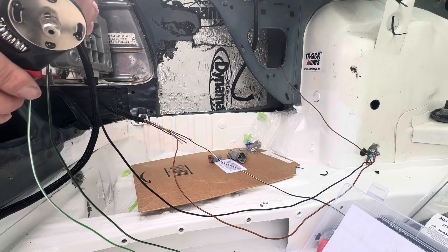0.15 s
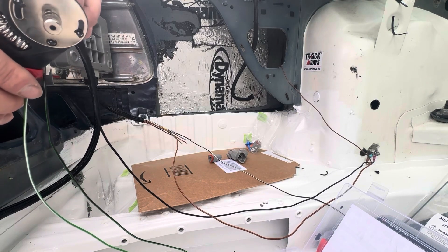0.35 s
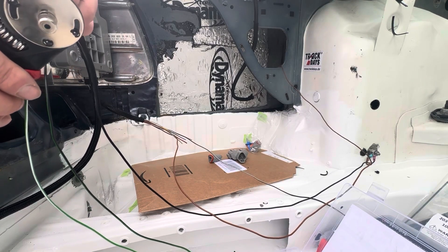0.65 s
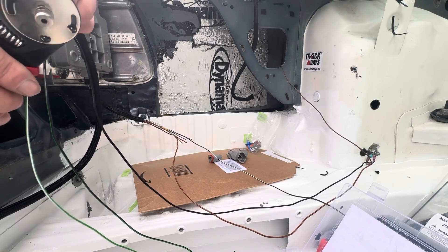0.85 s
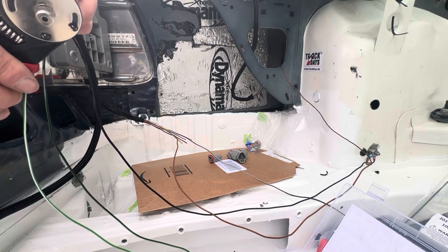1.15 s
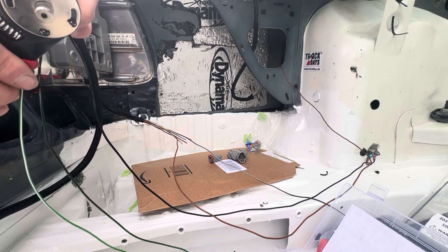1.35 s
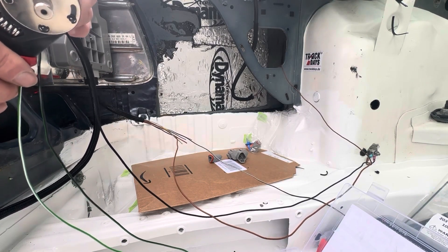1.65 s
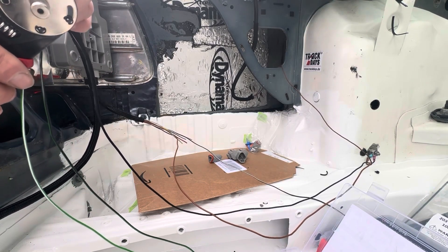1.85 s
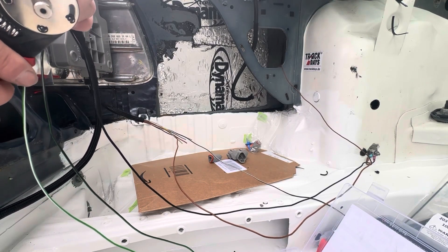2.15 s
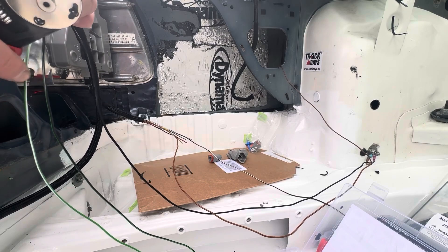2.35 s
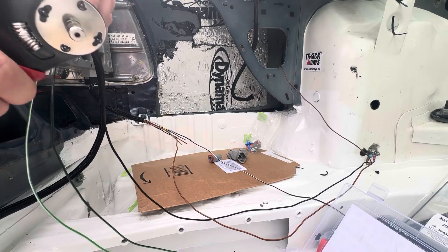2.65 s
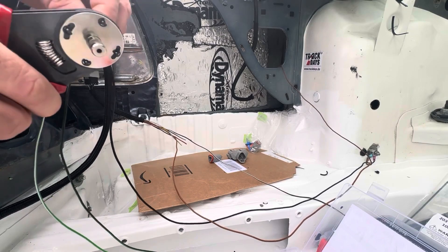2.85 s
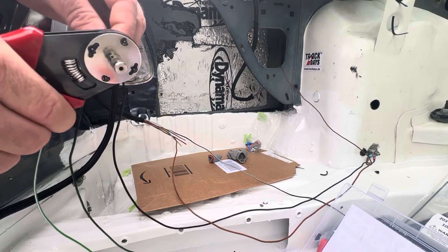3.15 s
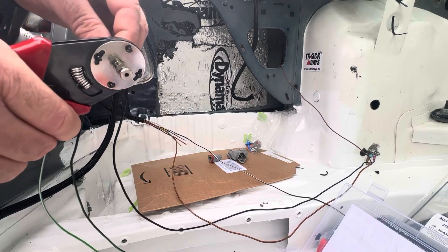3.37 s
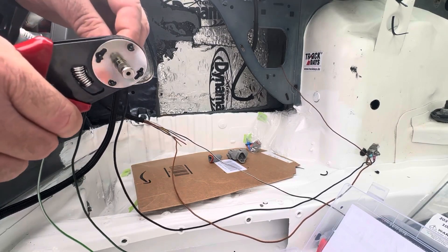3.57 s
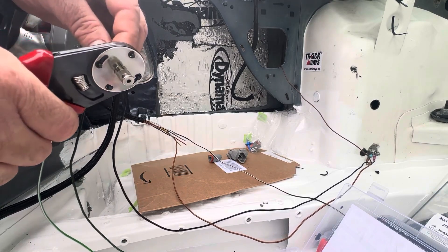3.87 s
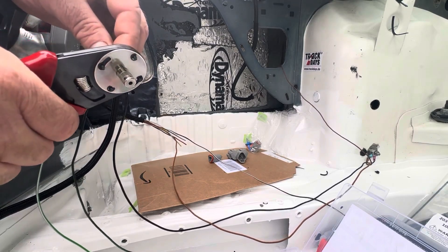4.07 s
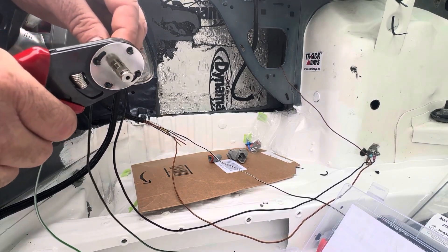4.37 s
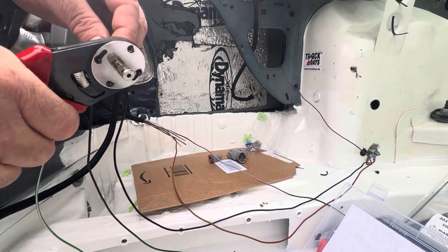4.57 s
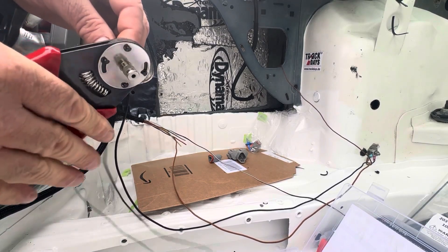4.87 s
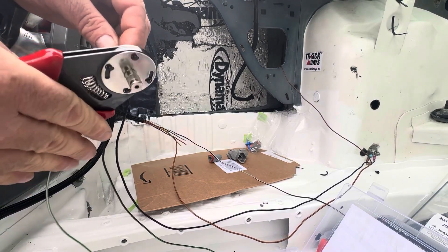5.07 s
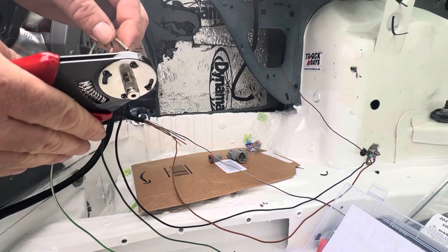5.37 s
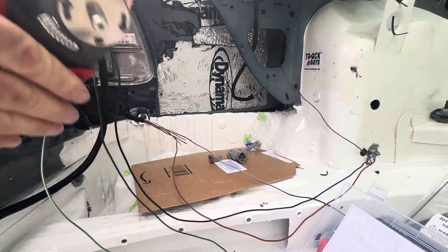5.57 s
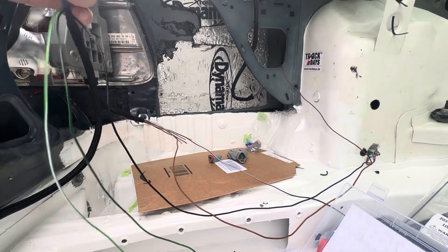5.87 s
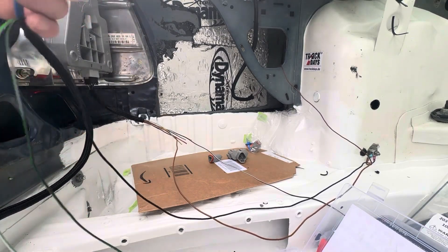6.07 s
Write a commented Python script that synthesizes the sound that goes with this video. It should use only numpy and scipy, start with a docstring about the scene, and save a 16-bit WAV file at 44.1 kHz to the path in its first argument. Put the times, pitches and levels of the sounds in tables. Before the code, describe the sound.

Close view of a hand crimping tool in a bare steel car shell, over a faint low workshop hum. Tiny ticks and a brief crunch come first, then a pause, crisp ringing ratchet clicks in two groups, a short falling scuff, and a loud clack as the handles spring open. Wires rustle at the end with soft knocks and a quick pin chatter.

```python
"""A ratcheting crimp tool is squeezed on a small pin inside the bare steel shell of a car in a garage.
Light touches and wire rustle come first; then steel crunches as the pin seats, and the pawl, by impact
and modal ringing, drops over tooth after tooth. A sleeve scuffs past by stick-slip friction, the pawl
lets go and the handles spring open against their stop. Last, wires slide on the panels amid soft knocks,
the shell booms and the pin chatters. Filtered noise gives the workshop's faint hum throughout."""
import sys
import numpy as np
from scipy import signal
from scipy.fft import rfft, irfft
from scipy.io import wavfile

SR = 44100
rng = np.random.default_rng(int(sys.argv[2]) if len(sys.argv) > 2 else 0)


def store_pcm(level_fs):
    """Save levels as 16-bit WAV."""
    pcm = np.round(np.clip(level_fs, -1, 1) * 32767).astype(np.int16)
    wavfile.write(sys.argv[1], SR, np.atleast_2d(pcm).T)


N = 274302
TIME = np.arange(N) / SR
OPEN_ALIKE, HIDDEN_ALIKE = .75, .3  # left-right likeness of a sound in plain view, and behind the hand


def from_db(db):
    """Amplitude ratio: decibels to gain."""
    return 10 ** (np.asarray(db) / 20)


def rms_one(x):
    """Power normalization: scale to unit power."""
    return x / np.sqrt(np.mean(x ** 2) + 1e-20)


def at_hz(points, hz):
    """Logarithmic interpolation: read a table on a log-frequency axis."""
    f, value = np.transpose(points)
    return np.interp(np.log(np.maximum(hz, 1)), np.log(f), value)


def colour(x, spectrum):
    """Spectral shaping: weight a signal by a smooth spectrum, at unit power."""
    size = x.shape[-1]
    gain = from_db(at_hz(spectrum, np.fft.rfftfreq(size, 1 / SR)))
    return rms_one(irfft(rfft(x) * gain, size))


def shelve(x, top_db):
    """High shelf: lift or dull the highest treble, at unit power."""
    return colour(x, [(9500, 0), (14000, top_db)])


def bandlimit(x, hz, kind):
    """Second-order Butterworth filtering: pass the low, high or middle frequencies."""
    return signal.sosfilt(signal.butter(2, hz, kind, fs=SR, output="sos"), x)


def resonate(x, hz, width_hz):
    """Simple resonance: a two-pole filter with gain 1 on top."""
    r = np.exp(-np.pi * width_hz / SR)
    numerator = np.array([1, 0, -1]) * (1 - r * r) / 2
    denominator = [1, -2 * r * np.cos(2 * np.pi * hz / SR), r * r]
    return signal.lfilter(numerator, denominator, x)


def fade(t, t60):
    """Exponential decay: 60 dB down at t60."""
    return np.exp(-np.log(1000) * t / t60)


def add(track, s, sound):
    """Superposition: mix a sound into a track at a time."""
    start = max(round(s * SR), 0)
    part = sound[..., :N - start]
    track[..., start:start + part.shape[-1]] += part


def strokes(rows, swell_db_per_s, fade_db_per_s):
    """Stroke envelope: each (time, hold, level) row swells up to its time, holds, then dies away."""
    power = 0
    for s, hold_s, db in rows:
        before_db = swell_db_per_s * np.maximum(s - TIME, 0)
        after_db = fade_db_per_s * np.maximum(TIME - s - hold_s, 0)
        power = power + from_db(db - np.minimum(before_db + after_db, 200)) ** 2
    return np.sqrt(power)


def ringing(hz, db, t60):
    """Modal superposition: one second of decaying modes, each a quarter cycle apart at the two channels."""
    t = TIME[:SR]
    apart = rng.choice([-1, 1], (len(hz), 1)) * np.pi / 2
    phase = rng.uniform(0, 2 * np.pi, (len(hz), 1)) + np.array([0 * apart, apart])
    waves = np.sin(2 * np.pi * hz[:, None] * t + phase)
    return np.sum(from_db(db)[:, None] * fade(t, t60[:, None]) * waves, axis=1)


def overtones(low_hz, high_hz=14000, count=140, t60=0.24):
    """High modal density: many close modes of spring, pins and plates make a grainy, decaying shimmer."""
    lines = np.zeros((2, SR // 2 + 1), complex)
    hz = (low_hz * (high_hz / low_hz) ** rng.random(count)).astype(int)
    lines[:, hz] = rng.standard_normal(count) * np.exp(2j * np.pi * rng.random((2, count)))
    return rms_one(irfft(lines, SR)) * fade(TIME[:SR], t60)


# spectrum of steel meeting steel: (frequency [Hz], level [dB])
CONTACT_SPECTRUM = [(400, -21), (1000, -16), (1700, -14), (2700, -4), (3600, -3.5), (4500, -6.5),
                    (5600, -2.5), (7000, -3), (10500, -1), (15500, -5)]


def crack(length_ms, humps, top_db=0, buzz_db=-23, buzz_t60=0.043):
    """Impact excitation: a brief burst with broad (Hz, dB) resonances, then a short buzz of loose parts."""
    t = TIME[:2048]
    build_up = 1 - np.exp(-t / .0004)
    blow = np.exp(-t * 1000 / max(length_ms, .2))
    envelope = (blow + from_db(buzz_db) * fade(t, buzz_t60)) * build_up
    burst = rms_one(colour(rng.standard_normal((2, len(t))), CONTACT_SPECTRUM) * envelope)
    for hz, db in humps:
        noise = rng.standard_normal((2, len(t))) * envelope
        burst = burst + from_db(db) * rms_one(resonate(noise, hz, hz / 8))
    burst = shelve(burst, top_db) * np.sqrt(np.mean(envelope ** 2))
    return bandlimit(burst, 900, "high")


def at_channels(x, alike):
    """Interchannel coherence: from the left, the right is a little late, inverted and only partly alike."""
    lag_s = .000204
    late = np.interp(TIME - lag_s, TIME, x[0])
    return np.array([x[0], np.sqrt(1 - alike ** 2) * x[1] - alike * late])


# ring of the car's shell: (frequency [Hz], t60 [s])
SHELL_DECAY = [(300, 0.32), (1500, 0.51), (4000, 0.16), (9000, 0.0063), (15000, 0.053)]
# ring of the garage round it: (frequency [Hz], t60 [s])
GARAGE_DECAY = [(2500, 0.39), (12000, 0.2)]


def shell(x, early_db, shell_db, garage_db, early_t60=0.041):
    """Reverberation: dense echoes off the close panels, the ring of the shell, and a faint garage tail."""
    t, edges = TIME[:SR * 3 // 4], np.geomspace(100, 18000, 12)
    response = 0
    for low, high in zip(edges, edges[1:]):
        noise = bandlimit(rng.standard_normal((2, len(t))), [low, high], "band")
        middle = np.sqrt(low * high)
        stages = [(early_db, early_t60), (shell_db, at_hz(SHELL_DECAY, middle)),
                  (garage_db, at_hz(GARAGE_DECAY, middle))]
        power = 0
        for db, t60 in stages:
            decay = fade(t, t60) ** 2
            power = power + from_db(db) ** 2 * decay / np.sum(decay)
        response = response + noise * np.sqrt(power)
    response = response * (1 - np.exp(-t / 0.000057))
    return signal.fftconvolve(np.atleast_2d(x), response, axes=1)[:, :N]


# pawl and jaw clicks, shares and ring relative to each click:
# (time [s], level [dB], clack frequency [Hz], clack share [dB], ping share [dB], ring [dB])
PAWL_CLICKS = [(0.8752, -39.5, 4500, 16, -3.5, 1.5), (0.896, -19.5, 4700, 0.5, -12, -14.5),
               (0.9134, -36, 4300, 1.5, -2.5, -2.5), (0.9193, -33, 3920, 4.5, -4.5, 0.5),
               (2.3782, -13, 3320, -13.5, -5.5, -6), (2.4987, -34.5, 4260, -3, -14, 2),
               (2.539, -13, 3500, -8, 1, -0.5), (3.5929, -16, 2760, -13.5, 2, 1),
               (3.6517, -12, 5870, -8.5, -5.5, -5.5), (3.7105, -26, 5200, -3, -12, 3),
               (4.8342, -22.5, 2500, -5.5, -1.5, -5.5), (4.8431, -14.5, 3600, -9, -6, -6.5),
               (4.851, -3, 2350, -15, -13.5, -6), (4.8610, -10.5, 2550, -9.5, -5.5, -8.5),
               (4.9838, -34, 3600, -8, -4, 7.5)]
# the steel rings differently as the handles move: (frequency [Hz], t60 [s],
# level at first tooth [dB], at second tooth [dB], at last teeth [dB], sprung open [dB])
STEEL_MODES = [(2325, .95, -38, -60, -42.5, -54), (2396, .33, -60, -60, -60, -31),
               (2490, .1, -34, -55, -44, -25), (2729, .22, -55, -55, -55, -38),
               (3483, .27, -24, -29, -33, -39), (3487, 1.1, -52, -47, -62, -65),
               (4060, 1.3, -75, -75, -75, -57), (4495, .38, -55, -55, -55, -37),
               (4587, .15, -52, -26, -35, -42), (5640, .23, -45, -32, -33, -41),
               (6725, .25, -46, -40, -42, -44), (8409, .15, -46, -34, -46, -38),
               (9490, .22, -37, -42, -46, -46), (11090, .18, -35, -44, -40, -46),
               (11700, .16, -33, -41, -38, -48)]
# moments that part the four columns of levels: (time [s])
HANDLE_MOVES = [2.45, 3.2, 4.5]


def ratchet(modes_db=-2, overtones_db=-29):
    """Impact and modal response: each click cracks and rings the tool, damped at first by the fingers."""
    free_from_s = 2.0
    crunch_ms, snap_ms, stop_ms = 2.9, 0.6, 1.5  # pin seating, free pawl, handles opening
    ping_hz = 9000
    scatter_db, grip_shade_db, release_scatter_db = 7.5, -15, -8  # share of a click reaching the panels
    grip_damping_db, ring_rise_s = -11.5, .007  # the ring swells as it fills the shell
    out, scattered = np.zeros((2, N)), np.zeros(N)
    modes = np.array(STEEL_MODES)
    swell = 1 - np.exp(-TIME[:SR] / ring_rise_s)
    for s, db, clack_hz, clack_db, ping_db, ring_db in PAWL_CLICKS:
        gripped, released = s < free_from_s, s > HANDLE_MOVES[-1]
        length_ms = crunch_ms if gripped else stop_ms if released else snap_ms
        top_db = -3 if released else 6  # bright at the teeth, duller as the handles open
        hit = np.zeros((2, N))
        add(hit, s, from_db(db) * crack(length_ms, [(clack_hz, clack_db), (ping_hz, ping_db)], top_db))
        out += at_channels(hit, HIDDEN_ALIKE if gripped or released else OPEN_ALIKE)
        panel_db = scatter_db + grip_shade_db * gripped + release_scatter_db * released
        scattered += hit[0] * from_db(panel_db)
        mode_db = modes[:, 2 + np.searchsorted(HANDLE_MOVES, s)]
        # parts under load shimmer higher than those rattling loose
        shimmer = overtones(low_hz=2300 if released else 6000)
        ring = from_db(modes_db) * ringing(modes[:, 0], mode_db, modes[:, 1])
        ring = ring + from_db(overtones_db) * shimmer
        add(out, s, from_db(db + ring_db + grip_damping_db * gripped) * ring * swell)
    echoes = shell(scattered, early_db=-6, shell_db=-10, garage_db=-28)
    return (out + echoes) * from_db([[.5], [-.5]])


# steel skids as the pin seats, a faint hiss before a click, then skids as the ratchet lets go
# and as the jaws leave the pin: (time [s], hold [s], relative level [dB])
STEEL_SKIDS = [(0.890, 0.013, -41.5), (2.326, 0.041, -65), (4.833, 0.026, -29), (5.068, 0.035, -60.5)]


def skid(skid_db=-1, tooth_decay=1.4, top_db=-7):
    """Repeated impact: noise pulsed at an uneven tooth rate makes the burr of skidding steel."""
    teeth_per_s = 520
    unevenness = 0.82 * rms_one(resonate(rng.standard_normal(N), 120, 180))  # in teeth
    teeth = TIME * teeth_per_s + unevenness
    pulses = np.exp(-tooth_decay * (teeth % 1))
    burr = shelve(colour(rng.standard_normal((2, N)), CONTACT_SPECTRUM) * pulses, top_db)
    burr = burr * strokes(STEEL_SKIDS, swell_db_per_s=2002, fade_db_per_s=555) * from_db(skid_db)
    return at_channels(burr, HIDDEN_ALIKE) + shell(burr[0], early_db=0, shell_db=-15, garage_db=-40)


# light touches of pin, wire and tool: (time [s], relative level [dB], ping frequency [Hz])
LIGHT_TOUCHES = [(0.184, -56.5, 12000), (0.218, -56, 4800), (0.382, -57, 11800), (0.4496, -48, 11700),
                 (0.639, -61, 11800), (0.693, -56, 4730), (0.726, -62, 12400), (0.852, -50, 4720),
                 (1.2525, -53, 4930), (2.278, -47.5, 3420), (2.322, -46, 13400), (2.751, -52, 3370),
                 (3.113, -44, 13200), (3.275, -45, 11660), (3.543, -48, 10900), (3.856, -47, 4530),
                 (3.8903, -46.5, 4600), (4.05, -42, 13150), (4.805, -37, 4796), (4.817, -46, 10900),
                 (5.064, -40, 4400), (5.1169, -44, 5000), (5.699, -40, 4680), (5.817, -52.5, 11300)]


def ticks(tick_db=1):
    """Weak impact: light touches crack and ping without ringing the tool."""
    out = np.zeros((2, N))
    for s, db, ping_hz in LIGHT_TOUCHES:
        add(out, s, from_db(db + tick_db) * crack(length_ms=0.96, humps=[(ping_hz, -1)]))
    return at_channels(out, OPEN_ALIKE) + shell(out[0], early_db=-5, shell_db=-5, garage_db=-24)


# the crimped pin chatters against the panel: (time [s], relative level [dB])
PIN_CHATTER = [(6.089, -37), (6.097, -31), (6.1024, -34), (6.1073, -38.5), (6.1117, -29)]
# its ring: (frequency [Hz], relative level [dB], t60 [s])
PIN_RING = [(2540, -16.5, 0.0048), (3500, 2.5, 0.0044), (5080, 8.5, 0.0052), (5430, 2.5, 0.021),
            (5800, 5, 0.0037), (10900, -11.5, 0.041)]


def pin(pin_db=-6.5, tap_db=-1):
    """Repeated impact and modal ringing: the small pin bounces a few times, off to the right."""
    out = np.zeros((2, N))
    hz, mode_db, t60 = np.transpose(PIN_RING)
    for s, db in PIN_CHATTER:
        add(out, s, from_db(db + pin_db) * ringing(hz, mode_db, t60)[0])
        add(out, s, from_db(db + pin_db + tap_db) * crack(length_ms=1.0, humps=[])[0])
    echoes = shell(out, early_db=0.5, shell_db=-14, garage_db=-20)
    return (out + echoes) * from_db([[-2.5], [2.5]])


# dull knocks of hand and cable on the body: (time [s], relative level [dB])
BODY_KNOCKS = [(0.896, -42.5), (1.475, -43), (4.852, -14.5), (4.915, -23), (4.923, -33.5), (4.934, -37),
               (4.947, -30), (5.636, -46.5), (5.7, -33), (5.801, -42), (5.921, -45), (6.154, -38)]
# body panel: (frequency [Hz], relative level [dB], t60 [s])
PANEL_RING = [(138, -7.5, 0.086), (232, -8.5, 0.1), (319.5, -11.5, 0.046), (585.4, -5.5, 0.047),
              (765.5, -3.5, 0.045), (917, -5.5, 0.034), (2257, -8, 0.015)]


def knocks(knock_db=-9.5, thud_db=-1, thud_t60=0.049, soft_hz=2800):
    """Soft impact: low-passed blows give a dull thud and the short modal ring of a body panel."""
    out, t = np.zeros((2, N)), TIME[:SR]
    hz, mode_db, t60 = np.transpose(PANEL_RING)
    for s, db in BODY_KNOCKS:
        thud = rms_one(resonate(rng.standard_normal((2, SR)), 1000, 1000)) * fade(t, thud_t60)
        add(out, s, from_db(db + knock_db) * (ringing(hz, mode_db, t60) + from_db(thud_db) * thud))
    out = bandlimit(out, soft_hz, "low")
    echoes = shell(out, early_db=-6.0, shell_db=-11.5, garage_db=-23.0)
    return (out + echoes) * from_db([[2.5], [-1.5]])


def sliding(spectrum, grain_db, pan_db, slips_per_s):
    """Stick-slip friction: tiny slips of uneven size come in clumps, heard partly off the panels."""
    clumps_db = 2.0 * rms_one(resonate(resonate(rng.standard_normal(N), 18, 40), 18, 40))
    size_db = clumps_db + grain_db * np.minimum(rng.exponential(1, N), 4)
    happens = rng.random(N) < slips_per_s / SR
    slips = happens * rng.choice([-1, 1], N) * from_db(size_db)
    rub = colour(slips + shell(slips, early_db=4, shell_db=-3, garage_db=-20), spectrum)
    return rub * from_db([[pan_db / 2], [-pan_db / 2]])


def rasp(x, pitch, width_hz):
    """Gliding resonance: a one-pole filter turns along a (time, frequency) curve, at unit power."""
    turn = np.exp(2j * np.pi * np.cumsum(np.interp(TIME, *np.transpose(pitch))) / SR)
    steady = signal.lfilter([1], [1, -np.exp(-np.pi * width_hz / SR)], x / turn)
    return rms_one(np.real(turn * steady))


# a sleeve scuffs past: (time [s], hold [s], relative level [dB])
SLEEVE_SCUFFS = [(4.177, 0.033, -50.5), (4.232, 0.005, -55), (4.283, 0.005, -63)]
# spectrum of its rub: (frequency [Hz], level [dB])
SCUFF_SPECTRUM = [(400, -9), (700, -5), (1300, -5.5), (1900, -1.5), (2450, -8), (3200, -6.5), (4200, -9),
                  (7000, -17), (15000, -30)]
# the rasp falls as the sleeve slows: (time [s], frequency [Hz])
RASP_GLIDE = [(4.179, 3490), (4.207, 1950), (4.29, 1470)]


def scuff(rasp_db=-2):
    """Stick-slip friction with a gliding resonance: a sleeve drags over the sill with a falling rasp."""
    rub = sliding(SCUFF_SPECTRUM, grain_db=2.5, pan_db=-2.5, slips_per_s=2500)
    rub = rub + from_db(rasp_db) * rasp(rub, RASP_GLIDE, width_hz=750)
    return rub * strokes(SLEEVE_SCUFFS, swell_db_per_s=1399, fade_db_per_s=356)


# wires slide over the panels: (time [s], hold [s], level [dB])
WIRE_STROKES = [(0.25, 0.044, -70.5), (1.476, 0.007, -70.5), (5.53, 0.5, -70), (5.70, 0.064, -64.5),
                (5.985, 0.1, -62), (6.13, 0.13, -57)]
# spectrum of their rustle: (frequency [Hz], level [dB])
RUSTLE_SPECTRUM = [(290, -7), (600, -14), (1800, 9.5), (2400, -0.5), (4600, -2.5), (8000, -9), (13000, -14),
                   (15500, -26)]


def wires():
    """Stick-slip friction: wires drag over the panels in a rustle of small separate slips."""
    rub = sliding(RUSTLE_SPECTRUM, grain_db=2.3, pan_db=-1.5, slips_per_s=1400)
    return rub * strokes(WIRE_STROKES, swell_db_per_s=331, fade_db_per_s=232)


# left-right likeness of the background: (frequency [Hz], correlation [-])
BACKGROUND_LIKENESS = [(60, .93), (130, .88), (290, .5), (640, 0.0), (15000, .05)]
# its lean: (frequency [Hz], left minus right [dB])
BACKGROUND_LEAN = [(110, -.7), (600, 3), (2400, -4.5), (12000, 0)]


def diffuse(spectrum):
    """Diffuse field: noise alike at both channels in the bass, nearly unrelated in the treble."""
    hz = np.fft.rfftfreq(N, 1 / SR)
    alike = np.clip(at_hz(BACKGROUND_LIKENESS, hz), -1, 1)
    sign = np.array([[1], [-1]])
    mid, side = rfft(rng.standard_normal((2, N)))
    both = np.sqrt(1 + alike) * mid + sign * np.sqrt(1 - alike) * side
    both = both * from_db(sign * at_hz(BACKGROUND_LEAN, hz) / 2)
    return colour(irfft(both, N), spectrum)


# someone shifts in the body shell: (time [s], hold [s], relative level [dB])
BODY_SHIFTS = [(5.58, 0.24, -42)]
# spectrum of the soft boom: (frequency [Hz], level [dB])
SHUFFLE_SPECTRUM = [(70, -4.5), (120, 16), (175, -6.5), (250, -2.5), (350, -5), (600, -24), (1500, -51)]


def shuffle(shuffle_db=-5):
    """Low-frequency noise excitation: the shell booms softly as someone shifts in it."""
    gain = strokes(BODY_SHIFTS, swell_db_per_s=9, fade_db_per_s=32)
    return from_db(shuffle_db) * gain * diffuse(SHUFFLE_SPECTRUM)


# spectrum of the room noise: (frequency [Hz], level [dB])
ROOM_SPECTRUM = [(22, -39), (42, -16.5), (58, -7), (80, -4), (122, -17.5), (195, -29), (250, -22),
                 (360, -30.5), (485, -37), (900, -33.5), (1860, -49), (3530, -58), (15000, -72)]
# hum: (frequency [Hz], half the width of each of two resonators [Hz], level [dB])
HUM_BANDS = [(65, 9.2, -53.5), (122.53, 3.7, -58.5), (160.4, 9.8, -63.5)]


def workshop(air_db=-47.5):
    """Narrow-band noise: sharp resonances make a wavering hum over low, diffuse room noise."""
    hum = 0
    for hz, width, db in HUM_BANDS:
        noise = rng.standard_normal(N + SR)
        band = resonate(resonate(noise, hz, 2 * width), hz, 2 * width)
        hum = hum + from_db(db) * rms_one(band[SR:])  # drop the filters' build-up
    return hum + from_db(air_db) * diffuse(ROOM_SPECTRUM)


def scene():
    """Linear superposition: tool, pin, body, cloth and wires over the workshop."""
    tool = ratchet() + skid() + ticks()
    body = pin() + knocks() + scuff() + wires()
    return tool + body + shuffle() + workshop()


def record(dry):
    """Soft saturation and low-pass filtering: sharp peaks are rounded and the top is cut steeply."""
    cutoff_hz = 15800
    rounded = .75 * np.tanh(dry / .75)
    return signal.sosfilt(signal.ellip(10, .2, 80, cutoff_hz, fs=SR, output="sos"), rounded)


dry = scene()
out = record(dry)
store_pcm(out)
```